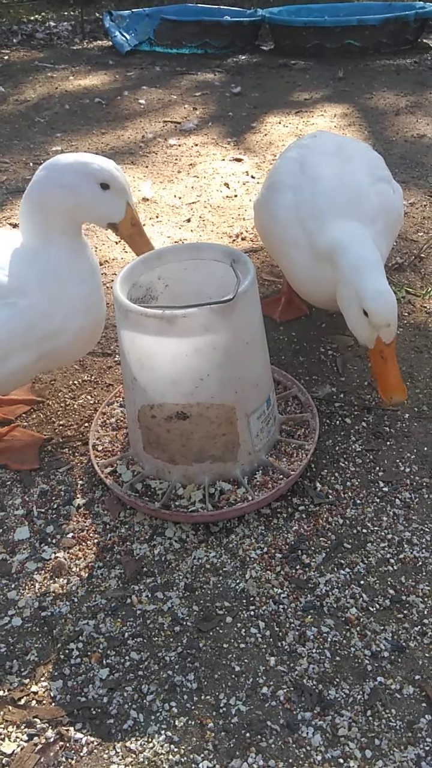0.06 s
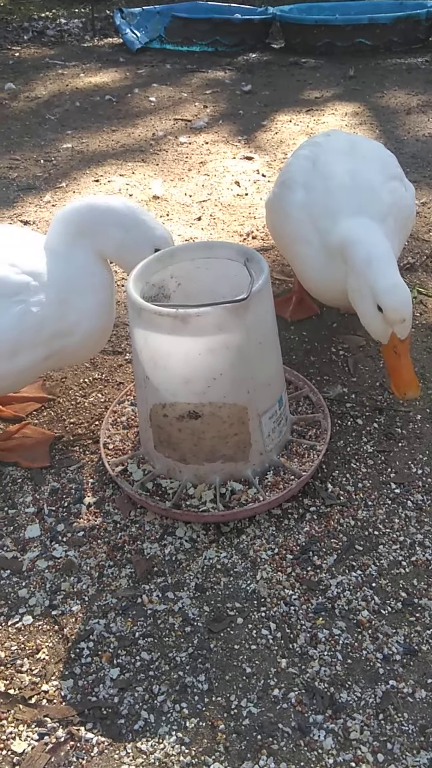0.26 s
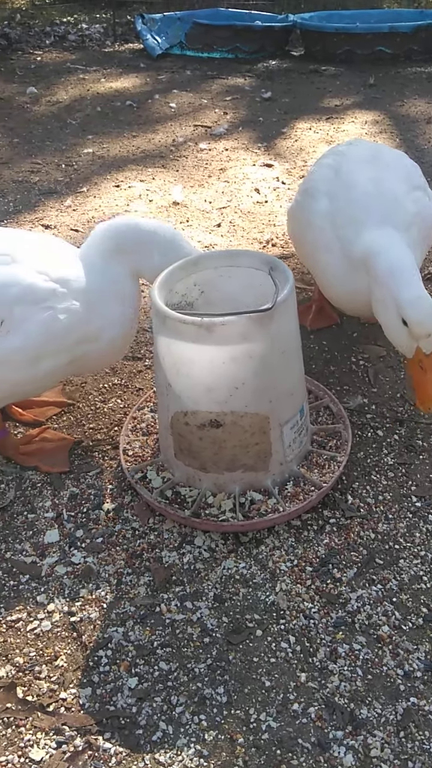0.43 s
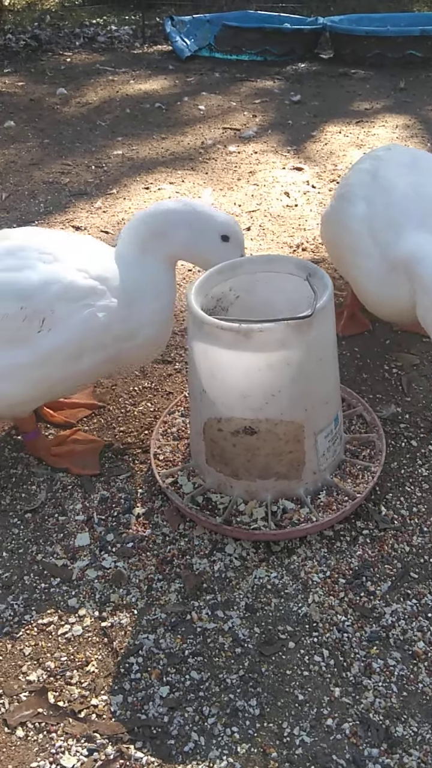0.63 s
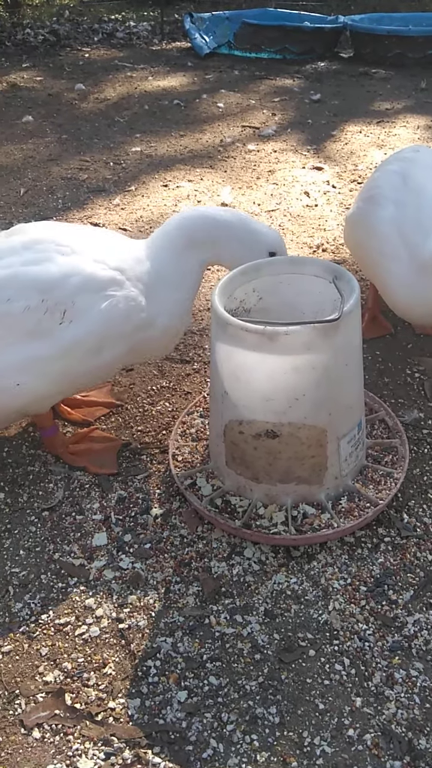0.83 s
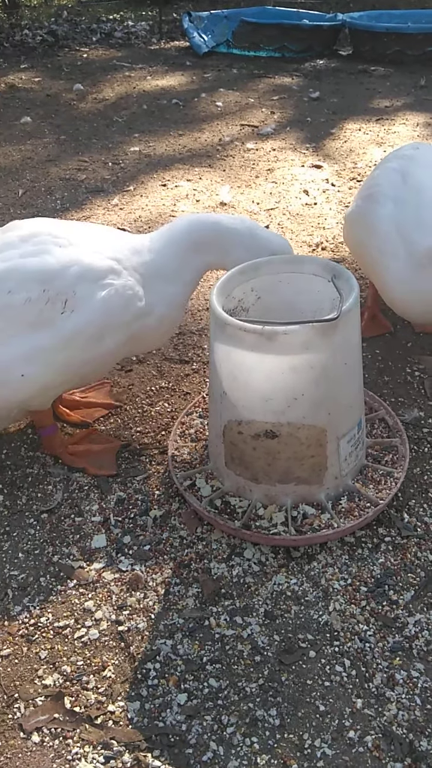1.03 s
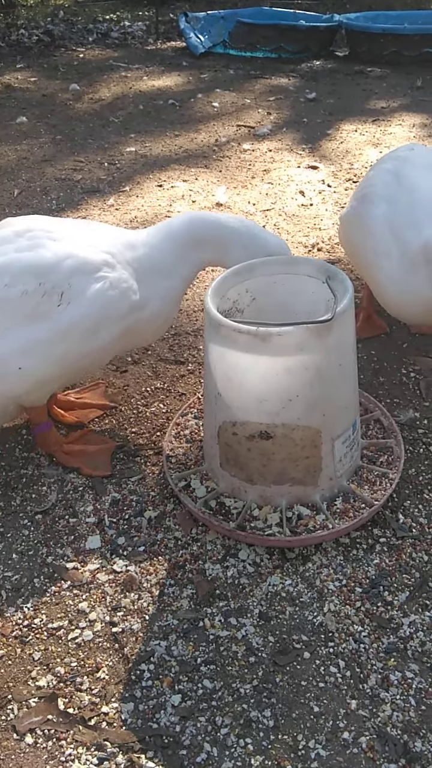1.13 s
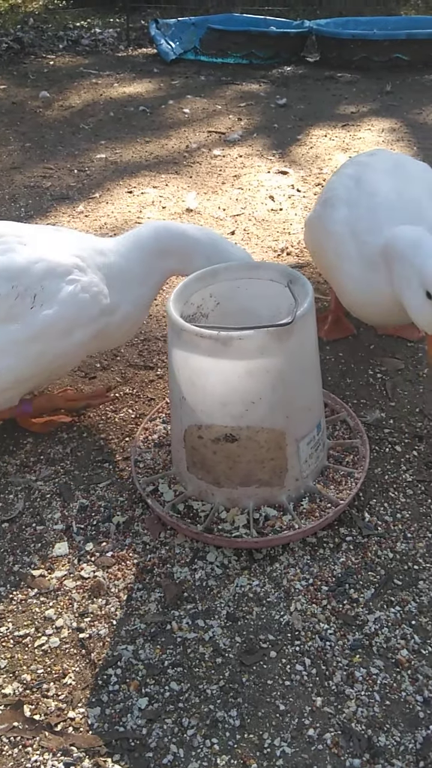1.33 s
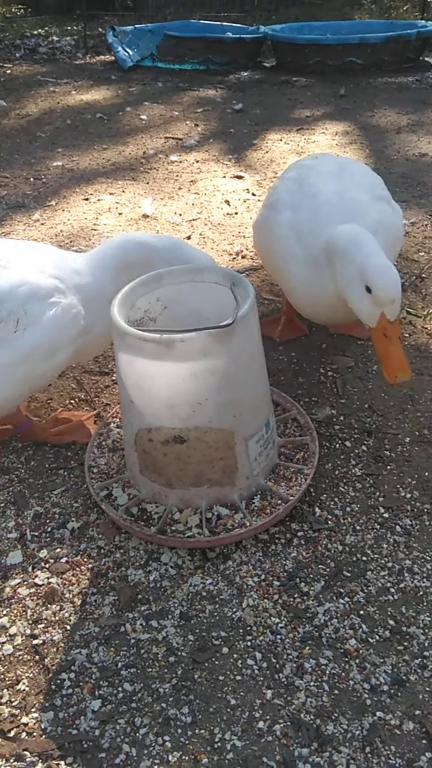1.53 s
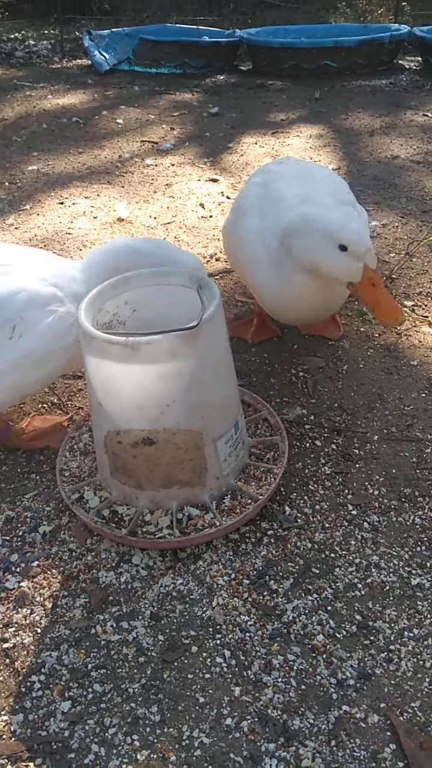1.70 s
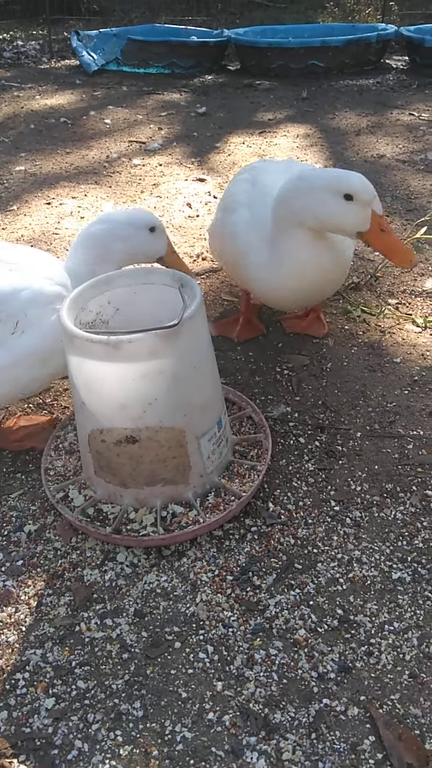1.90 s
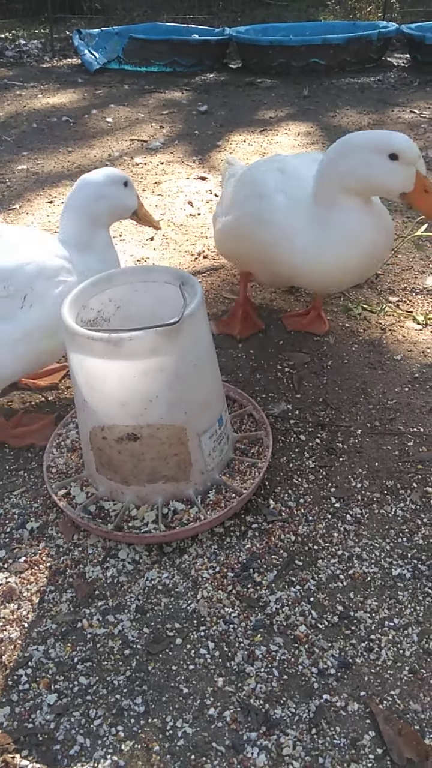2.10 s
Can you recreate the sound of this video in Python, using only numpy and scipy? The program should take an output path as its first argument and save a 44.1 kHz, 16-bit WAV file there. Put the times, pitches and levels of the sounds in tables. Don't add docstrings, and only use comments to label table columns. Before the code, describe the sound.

Ducks quacking outdoors: three low muffled grunts, then two loud raspy quacks, with small bill clicks

```python
import sys
import numpy as np
from scipy import signal
from scipy.fft import rfft, irfft, next_fast_len
from scipy.io import wavfile
from scipy.ndimage import map_coordinates

SR = 44100
rng = np.random.default_rng(int(sys.argv[2]) if len(sys.argv) > 2 else 0)


def amplitude_ratio(level_db):
    exponent = np.asarray(level_db, float) / 20
    return 10 ** exponent


def generate_wav(sig):
    pcm = np.round(np.clip(np.atleast_2d(sig).T, -1, 1) * 32767).astype(np.int16)
    wavfile.write(sys.argv[1], SR, pcm)


N = 94815


def unit(x):
    return x / np.sqrt(np.mean(x ** 2) + 1e-20)


def along(points, hz):
    f, v = np.transpose(points)
    return np.interp(np.log(hz + 1), np.log(f + 1), v)


def curves(rows, whole=False):
    s, *cols = np.transpose(rows)
    i = np.arange(N) if whole else np.arange(round(s[0] * SR), min(round(s[-1] * SR), N))
    return i[0], [np.interp(i / SR, s, c) for c in cols]


def wobble(rate, count=N):
    knots = rng.standard_normal(int(N * rate / SR) + 4)
    return map_coordinates(knots, [np.arange(count) * rate / SR])


def filtered(x, response):
    m = next_fast_len(x.shape[-1] + 8192)
    return irfft(rfft(x, m) * response(np.fft.rfftfreq(m, 1 / SR)), m)[..., :x.shape[-1]]


def shaped_noise(count, points):
    return unit(filtered(rng.standard_normal(count), lambda f: amplitude_ratio(along(points, f))))


def resonances(rows, scale, order=1):
    def response(f):
        total = 0
        for centre, w, db in rows:
            total = total + amplitude_ratio(db) * (1j * f * w / ((centre * scale) ** 2 - f * f + 1j * f * w)) ** order
        return total
    return response


def add(track, x, start):
    track[start:start + len(x)] += x[:len(track) - start]


def countryside():
    # frequency in Hz, spectrum in dB per Hz
    air_spectrum = [(25, -14), (60, 0), (110, -8.5), (300, -15.5), (600, -21.5), (6000, -27.5), (9000, -33),
                    (12300, -38), (13500, -43.5)]
    # frequency in Hz, left-right likeness
    likeness = [(120, .9), (470, 0.3), (1800, 0.064)]

    def sum_and_difference(f):
        turn = np.arccos(np.clip(along(likeness, f), -1, 1)) / 2
        return amplitude_ratio(along(air_spectrum, f)) * (f < 15400) * (f > 30) * [np.cos(turn), np.sin(turn)]

    mid, side = filtered(rng.standard_normal((2, N)), sum_and_difference)
    hiss = np.array([mid + side, mid - side]) / np.std(filtered(mid, lambda f: f > 200))
    return amplitude_ratio(-75.5 + 0.44 * wobble(0.81)) * hiss


def cricket():
    trill_hz, first_s, level_db = 12, 0.038, -79.5
    t = np.arange(N) / SR
    strokes = np.maximum(np.cos(2 * np.pi * trill_hz * (t - first_s)), 0) ** 2 * amplitude_ratio(3 * wobble(1))
    wing = unit(filtered(rng.standard_normal((2, N)), resonances([(5770, 90, 0)], 1)))
    return amplitude_ratio(level_db) * strokes * wing


def tone(hz):
    return np.sqrt(2) * np.sin(2 * np.pi * np.cumsum(hz) / SR)


def engine_throb():
    # centre of a swell in seconds, peak in dB
    swells = [(0.082, -59.5), (.37, -57), (0.648, -64), (0.819, -57.5), (1.098, -59), (1.33, -60.5),
              (1.41, -61.5), (1.668, -62), (1.95, -57.5)]
    swell_s = 0.062
    t = np.arange(N) / SR
    envelope = sum(amplitude_ratio(db) * np.exp(-((t - s) / swell_s) ** 2) for s, db in swells)
    throb = envelope * amplitude_ratio(1.4 * wobble(14)) * tone(63 + 5 * wobble(14))
    return throb * amplitude_ratio([[-1.4], [1.2]])


def drone():
    # time in seconds, frequency in Hz, level in dB
    drift = [(0, 150, -78.5), (.66, 156, -82.5), (.78, 170, -63.5), (1.1, 166, -62), (1.3, 153, -74),
             (2.0, 147.5, -72.5)]
    hz, db = curves(drift, True)[1]
    return amplitude_ratio(db + 0.96 * wobble(11)) * tone(hz + 3 * wobble(30)) * amplitude_ratio([[-.8], [.8]])


def whine():
    # time in seconds, level in dB
    breeze = [(.04, -89), (.11, -75), (.28, -60), (.36, -84.5), (.7, -129.5), (.85, -68), (1.07, -67),
              (1.16, -84), (1.5, -91), (1.8, -80), (1.86, -67), (2.04, -71.5), (2.1, -78.5)]
    db = curves(breeze, True)[1][0]
    sides_db = np.array([-6.5 + 4 * wobble(18), 1.1 * wobble(6.7)])
    return amplitude_ratio(db + sides_db) * tone(1236 + 1.8 * wobble(18))


def yard(x):
    # frequency in Hz, decay time t60 in seconds
    decay = [(200, 0.16), (1200, 0.18), (5000, 0.26), (10000, 0.68)]
    tilt_db = -1.5
    scatter_hz, leaves_hz = 1400, 2200
    treble = filtered(x, lambda f: f > leaves_hz)
    x = x + treble * (unit(wobble(scatter_hz)) - 1)
    hz, t, z = signal.stft(rng.standard_normal((2, SR // 2)), SR, nperseg=256)
    hz = hz[:, None]
    tail_db = -60 * t / along(decay, hz) + tilt_db * np.log2(hz / 1000 + .15)
    tail = signal.istft(z * amplitude_ratio(tail_db), SR, nperseg=256)[1]
    tail = tail / np.linalg.norm(tail[0])
    return signal.fftconvolve(np.pad(x, (300, 0))[None], tail, axes=1)[:, :N]


def ports(x, paths):
    feeder, left_lift = [(980, 610, 0)], [(7100, 6050, -0.24)]  # Hz, width Hz, dB
    bass_lag_ms, bass_lag_hz = .09, 800

    def late(f, ms, gain):
        return gain * np.exp(-2j * np.pi * f * ms / 1000)

    def response(f):
        treble_lift = 1 + abs(resonances(left_lift, 1, order=2)(f))
        left = treble_lift * late(f, bass_lag_ms / (1 + (f / bass_lag_hz) ** 2), 1)
        cavity = resonances(feeder, 1, order=2)(f)
        arrivals = [late(f, *direct) + late(f, *ring) * cavity for direct, ring in paths]
        return np.array([left, np.ones_like(f)]) * arrivals

    return filtered(x, response)


def struck(hz, db, t60):
    t = np.arange(SR // 4) / SR
    return amplitude_ratio(db - 60 * t / t60) * np.sin(2 * np.pi * hz * t) * (1 - np.exp(-t / 0.00045))


def gulps(track):
    # start in seconds, peak in dB, pitch scale
    swallows = [(0.428, -57.5, 0.82), (0.825, -60, 1.25), (1.468, -74, .9), (1.574, -63, 0.98),
                (1.782, -54, 1.044), (1.975, -54.5, 1.04), (2.102, -62, 0.96)]
    # mode in Hz, level in dB, t60 in seconds
    crop = [(316, 12.5, 0.059), (450, 17, 0.023), (615, 3, 0.01387)]
    t = np.arange(SR // 4) / SR
    for s, db, scale in swallows:
        wet = amplitude_ratio(4 * wobble(220, len(t))) * (1 - np.exp(-t / .0015))
        modes = sum(struck(hz * scale, db + mode_db, t60) for hz, mode_db, t60 in crop)
        add(track, wet * modes, round(s * SR))


def bill_clicks(track):
    # start in seconds, peak in dB, frequency in Hz, t60 in seconds
    clicks = [(.0615, -44, 3300, 0.011), (0.63, -43.5, 5300, 0.013), (1.817, -40, 4150, 0.0069),
              (2.4, -47, 4570, 0.012), (1.906, -54, 3800, .008), (1.911, -53, 3000, .01),
              (1.82, -50, 3300, .01), (2.105, -44.5, 1440, 0.03), (1.765, -62, 3300, 0.013),
              (1.793, -51, 3300, 0.011), (2.1, -49, 7500, .01), (1.998, -65, 4300, .03),
              (2.137, -58.5, 5400, .012), (2.107, -50, 1040, 0.037), (1.1, -59.5, 4000, 0.00798)]
    for s, db, hz, t60 in clicks:
        add(track, struck(hz, db, t60), round(s * SR))


def squeaks(track):
    # time in seconds, pitch in Hz, first partial in dB, second partial in dB
    glides = [
        [(1.793, 686, -102, -60), (1.803, 857, -74, -62.5), (1.811, 997, -102, -52), (1.824, 868, -61, -60.5),
         (1.833, 682, -58.5, -53), (1.839, 530, -42, -52), (1.858, 443, -63, -62)],
        [(2.005, 1113, -87, -69), (2.014, 810, -103, -68), (2.022, 798, -47.5, -50), (2.028, 782, -59, -67),
         (2.036, 648, -56.5, -57), (2.046, 458, -51, -77), (2.057, 450, -66, -48)],
    ]
    for rows in glides:
        start, (hz, first_db, second_db) = curves(rows)
        turn = 2 * np.pi * np.cumsum(hz) / SR
        flutter = amplitude_ratio(2.2 * wobble(250, len(hz))) * signal.windows.tukey(len(hz), .15)
        partials = amplitude_ratio(first_db) * np.sin(turn) + amplitude_ratio(second_db) * np.sin(2 * turn)
        add(track, np.sqrt(2) * flutter * partials, start)
    nostrils = resonances([(2530, 900, 0.5), (4520, 1300, -3.0), (6600, 1800, -8)], 0.84, order=2)
    rasp = unit(filtered(rng.standard_normal(SR // 20), nostrils))
    add(track, amplitude_ratio(-58 + 3.3 * wobble(228, len(rasp))) * np.hanning(len(rasp)) * rasp, round(1.81 * SR))


def whistles(track):
    # start in seconds, length in seconds, first Hz, last Hz, peak in dB
    jets = [
        (2.122, .045, 1380, 1500, -52),
        (2.124, .045, 830, 850, -63),
        (1.59, .045, 1400, 1750, -71),
        (.41, .033, 6200, 8050, -60),
    ]
    for s, length, first_hz, last_hz, db in jets:
        u = np.arange(round(length * SR)) / (length * SR)
        turn = 2 * np.pi * np.cumsum(last_hz - (last_hz - first_hz) * (1 - u) ** 2) / SR
        add(track, amplitude_ratio(db + 0.8 * wobble(200, len(u))) * np.sin(np.pi * u) * np.sin(turn), round(s * SR))


def nostril_hiss(track):
    # start in seconds, length in seconds, level in dB
    puffs_of_air = [
        (.395, .1, -74),
    ]
    for s, length, db in puffs_of_air:
        noise = rng.standard_normal(round(length * SR))
        puff = unit(filtered(noise, lambda f: (f < 12200) * resonances([(10500, 5000, 0)], 1, order=2)(f)))
        add(track, amplitude_ratio(db) * np.hanning(len(puff)) * puff, round(s * SR))


def snap_and_rustle(track):
    # frequency in Hz, spectrum of the snap in dB per Hz
    snap_spectrum = [(710, -41), (1300, -0.5), (2500, 1), (5100, -6), (6200, 5), (7500, -10.5),
                     (10500, -33.5), (12500, -65)]
    # frequency in Hz, spectrum of the rustle in dB per Hz
    feathers = [(500, -30), (1500, -3.5), (5000, -1), (7000, -4), (9000, -15.5), (12000, -15.5),
                (12600, -63.5)]
    snap_s, snap_db, snap_t60 = .8305, -29.5, .011
    rebound_s, rebound_db = .0032, -11
    rustle_db, rustle_t60 = -53.5, 0.22
    t = np.arange(SR // 4) / SR
    noise = shaped_noise(len(t), snap_spectrum)
    for late_s, loss_db in [(0, 0), (rebound_s, rebound_db)]:
        decay = amplitude_ratio(snap_db + loss_db - 60 * t / snap_t60)
        add(track, noise * np.minimum(t / 0.0004, 1) * decay, round((snap_s + late_s) * SR))
    lumps = amplitude_ratio(4.7 * wobble(170, len(t)))
    decay = amplitude_ratio(rustle_db - 60 * t / rustle_t60)
    rustle = shaped_noise(len(t), feathers) * np.minimum(t / .012, 1)
    add(track, rustle * lumps * decay, round(snap_s * SR))


def feeding():
    track = np.zeros(N)
    for source in (gulps, bill_clicks, squeaks, whistles, nostril_hiss, snap_and_rustle):
        source(track)
    return track


def call(track, rows, throat, scale, rasp, top_hz, way, airway):
    scatter_db, jitter = 1.2, .02
    pulse_hz = 1320
    effort_power, patchy_db = 1.82, 4
    upper_rasp = 1.8
    breath_tail_s = .035
    start, (db, hz) = curves(rows)
    begun, slide, upper_db, breath_db = way

    cycles = np.cumsum(hz) / SR + begun
    at = np.flatnonzero(np.diff(np.floor(cycles)) > 0)
    chance = rng.standard_normal((len(at), 2))
    at = np.clip(at + (jitter * chance[:, 0] * SR / hz[at]).astype(int), 0, len(hz) - 1)
    pulses = np.zeros(len(hz))
    pulses[at] = -amplitude_ratio(scatter_db * chance[:, 1]) * np.sqrt(SR / hz[at])
    puffs = rasp * rng.standard_normal(len(hz)) * np.exp(-2.5 * (cycles % 1)) * np.sqrt(3)
    effort = amplitude_ratio(db - db.max())

    def pad(v):
        return np.pad(v, (0, SR // 8))

    def body(f):
        chest = resonances(throat[:2], scale)(f) / (1 + 1j * f / pulse_hz) ** 3
        return chest + resonances(throat[2:3], scale, order=3)(f)

    voice = filtered(pad((pulses + puffs) * effort), body)
    progress = np.linspace(-1, 1, len(hz))
    for row in throat[3:]:
        opening = amplitude_ratio(upper_db + patchy_db * wobble(120, len(hz))) * effort ** effort_power
        drive = (pulses + upper_rasp * puffs) * opening
        for place in np.linspace(-1, 1, 5):
            share = np.sqrt(np.maximum(1 - 2 * abs(progress - place), 0))
            voice += filtered(pad(drive * share), resonances([row], scale * slide ** (place / 2), order=3))
    voice = signal.sosfilt(signal.butter(4, top_hz, fs=SR, output="sos"), voice)
    voice *= np.sqrt(np.sum(amplitude_ratio(2 * db)) / np.sum(voice ** 2))

    flow = filtered(pad(effort), lambda f: .5 + .5 / (1 + 2j * np.pi * f * breath_tail_s))
    breath = shaped_noise(SR // 2, airway)[:len(flow)]
    breath_level = amplitude_ratio(db.max() + breath_db + 2.5 * wobble(180, len(flow)))
    add(track, voice + breath_level * flow * breath, start)


def grunts():
    # time in seconds, level in dB, pulse rate in Hz
    calls = [
        [(.0925, -53, 124.2), (.104, -46, 174.5), (.113, -39.5, 180.7), (.124, -41, 194), (.128, -48, 253),
         (.153, -60, 202)],
        [(.2075, -44.5, 153.6), (.228, -33, 137), (.24, -34, 170), (.245, -45.5, 244.5), (.26, -48.5, 209.3),
         (.283, -53, 170)],
        [(.356, -42, 128), (.378, -34.5, 151.9), (.391, -37.5, 150.4), (.396, -35, 203.4), (.405, -51.5, 193),
         (.42, -63.5, 170)],
    ]
    # resonance in Hz, width in Hz, level in dB; two of the chest, one of the neck, then the upper ones
    throat = [(175, 200, 3), (500, 170, 6.5), (960, 320, 0.5), (1804, 900, -8), (2700, 720, -11.5),
              (3503, 1020, -13.5)]
    neck = [0.952, 0.98, 0.77]
    # share of first cycle already run, end over start of upper resonances, their dB, breath in dB
    ways = [(.95, 1.18, -8, -38.5), (.97, .68, -0.5, -27.5), (0.972, 1.3, -1, -34.5)]
    # frequency in Hz, breath through the nostrils in dB per Hz
    airway = [(600, -30), (2000, 0), (4000, -2), (6000, -6), (9000, -14), (10500, -30), (12600, -60)]
    track = np.zeros(N)
    for rows, scale, way in zip(calls, neck, ways):
        call(track, rows, throat, scale, .44, 4894, way, airway)
    return track


def quacks():
    # time in seconds, level in dB, pulse rate in Hz
    calls = [
        [(.474, -52, 269.8), (.486, -30, 251.9), (.494, -25.5, 212.6), (.515, -22, 204.7), (.528, -24, 191.4),
         (.539, -23, 181.7), (.545, -53, 175)],
        [(.876, -62, 261.3), (.894, -35, 229.7), (.905, -24, 208.6), (.92, -22.5, 186.9), (.935, -24.5, 188.5),
         (.946, -35.5, 204.7), (.958, -63.5, 200)],
    ]
    # resonance in Hz, width in Hz, level in dB; two of the chest, one of the neck, then the upper ones
    throats = [
        [(221, 127, -2.5), (449, 31, -3), (1310, 720, 4), (2700, 630, -24.5), (3847, 1100, -21),
         (4727, 550, -12), (5970, 700, -16.5), (7200, 1400, -24)],
        [(203, 167, -1.5), (389.7, 380, -8), (1366, 506, 8), (2470, 900, -24.5), (3602, 716, -6.5),
         (4497, 440, -11.5), (5827, 700, -18), (7030, 1000, -32)],
    ]
    # share of first cycle already run, end over start of upper resonances, their dB, breath in dB
    ways = [(.62, 0.914, 0, -32), (.22, 1.2, 0, -25)]
    # frequency in Hz, breath through the open bill in dB per Hz
    airway = [(600, -30), (2000, 0), (4000, -2), (7000, -7), (9000, -9), (12000, -13), (12600, -60)]
    track = np.zeros(N)
    for rows, throat, way in zip(calls, throats, ways):
        call(track, rows, throat, 0.96, .47, 8000, way, airway)
    return track


def scene():
    # delay in ms, gain; direct sound, then the feeder's answer
    paths_shut = [
        [(.058, 0.91), (.9, 0.0051)],
        [(.01, 1.026), (1.2, 0.36)],
    ]
    # delay in ms, gain; direct sound, then the feeder's answer
    paths_open = [
        [(.055, 0.74), (.5, -0.16)],
        [(.01, 0.83), (2.2, .5)],
    ]
    background = countryside() + cricket() + engine_throb() + drone() + whine()
    near, loud = feeding() + grunts(), quacks()
    return background + amplitude_ratio(-16.5) * yard(near + loud) + ports(near, paths_shut) + ports(loud, paths_open)


def top_cut(x):
    return signal.sosfilt(signal.butter(12, 15700, fs=SR, output="sos"), x)


def record(dry):
    mix = filtered(dry, lambda f: (f < 15500) * f * f / (f * f + 45 ** 2))
    return top_cut(mix)


dry = scene()
out = record(dry)
generate_wav(out)
```